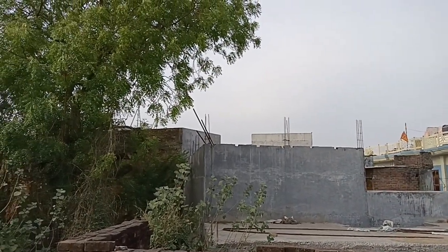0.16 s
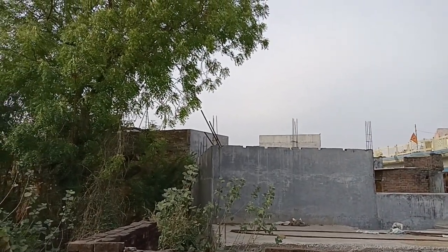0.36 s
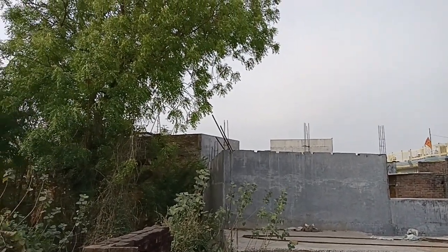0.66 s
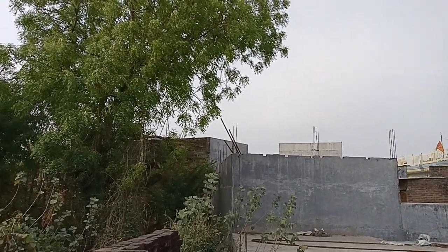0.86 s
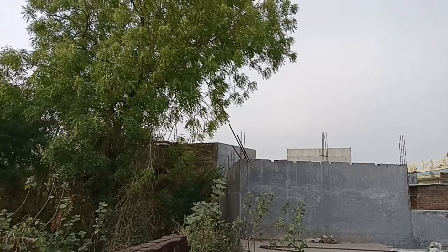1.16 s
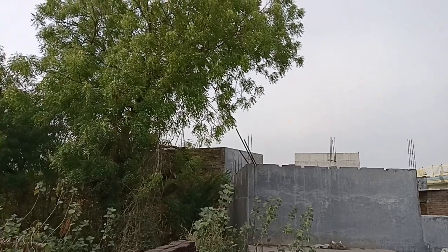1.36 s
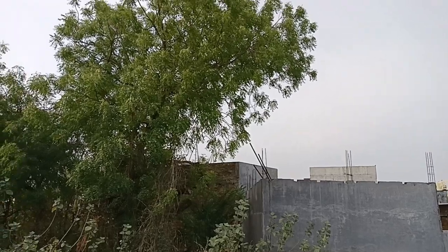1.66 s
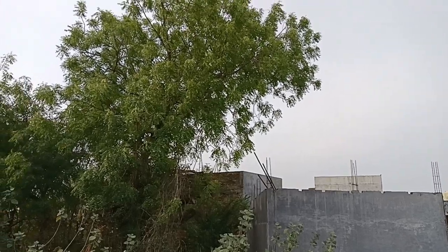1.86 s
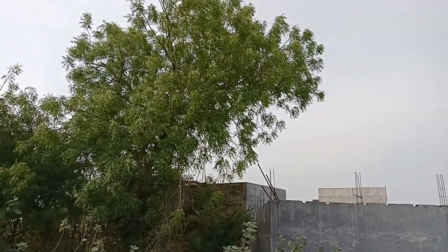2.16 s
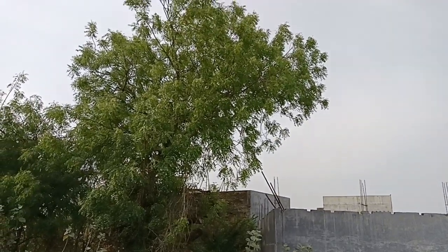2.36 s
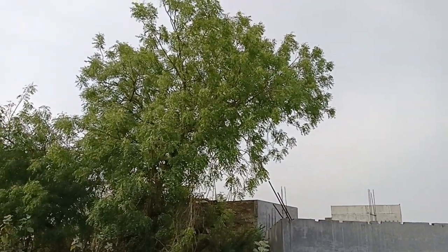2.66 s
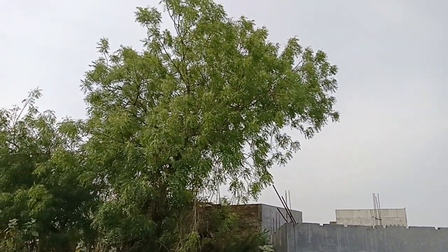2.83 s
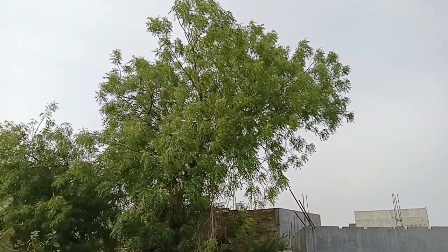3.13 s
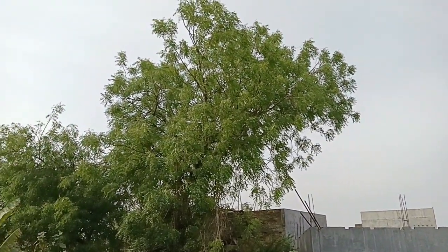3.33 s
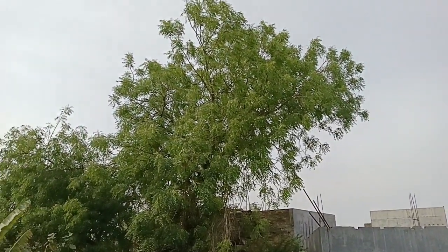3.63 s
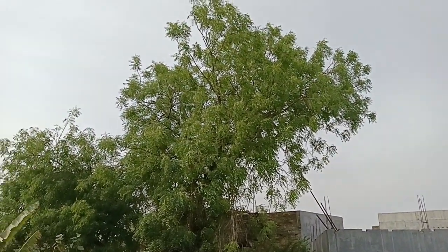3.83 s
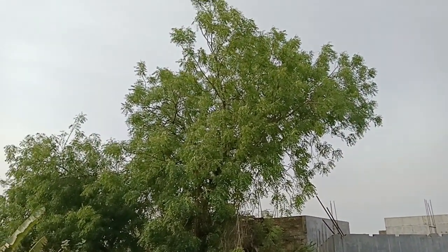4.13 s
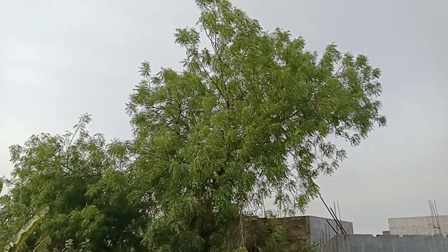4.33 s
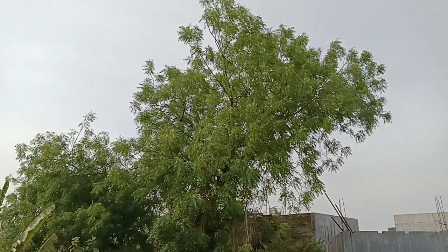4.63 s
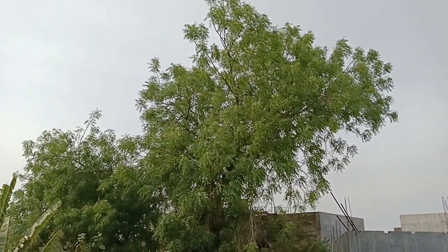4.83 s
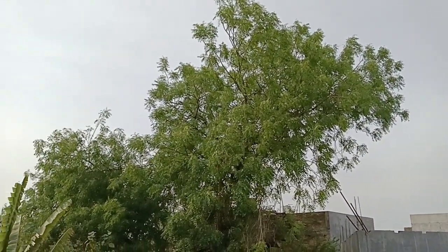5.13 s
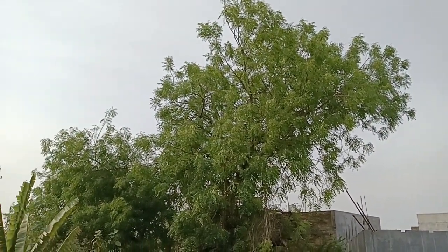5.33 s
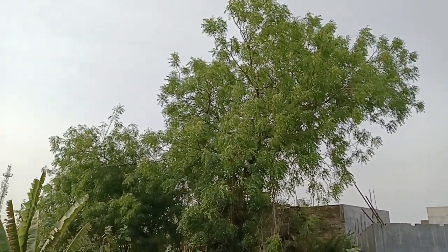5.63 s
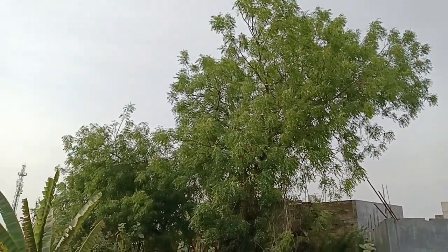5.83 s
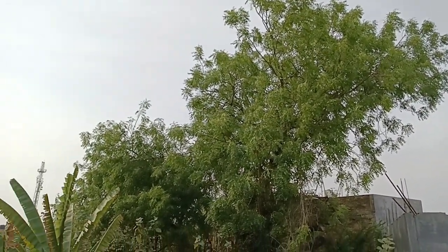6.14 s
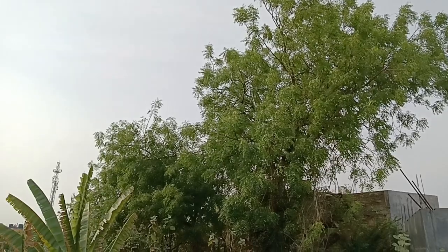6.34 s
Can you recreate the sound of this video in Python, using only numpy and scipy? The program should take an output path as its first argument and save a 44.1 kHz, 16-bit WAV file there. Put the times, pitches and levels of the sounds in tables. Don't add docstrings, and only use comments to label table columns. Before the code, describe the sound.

Clear, echoing bird whistles rise four times, each a little higher, while small birds chip and two distant horns sound over a quiet town.

```python
import sys
import numpy as np
from scipy import signal
from scipy.io import wavfile
from scipy.ndimage import uniform_filter1d

SR = 44100
rng = np.random.default_rng(int(sys.argv[2]) if len(sys.argv) > 2 else 0)


def gain_from_decibels(decibels):
    exponent = np.asarray(decibels, float) / 20
    return 10 ** exponent


def transcribe(u):
    v = np.clip(np.atleast_2d(u).T, -1, 1)
    q = np.round(v * 32767).astype(np.int16)
    wavfile.write(sys.argv[1], SR, q)


N = 286246
LEAD = 22050


def evened(x):
    return x / np.sqrt(np.mean(x ** 2) + 1e-20)


def drift(length, span):
    once = uniform_filter1d(rng.standard_normal(length), span)
    return evened(uniform_filter1d(once, span))


def read(points, hz):
    f, value = np.transpose(points)
    return np.interp(np.log(hz + 1), np.log(f + 1), value)


def curves(rows, smooth=1):
    s, *columns = np.transpose(rows)
    t = np.arange(s[0], s[-1], 1 / SR)
    return [uniform_filter1d(np.interp(t, s, c), smooth, mode="nearest") for c in columns]


def swells(rows, calm_db):
    t = np.arange(N) / SR
    bells = sum(gain_from_decibels(db) * np.exp(-((t - s) / width) ** 2) for s, db, width in rows)
    return 20 * np.log10(gain_from_decibels(calm_db) + bells)


def add(mix, s, sound, pan_db=0):
    part = mix[:, LEAD + round(s * SR):][:, :len(sound)]
    part += gain_from_decibels([[pan_db / 2], [-pan_db / 2]]) * sound[:part.shape[1]]


def stack(hz, orders, wobble=0.):
    turns = np.cumsum(hz * (1 + wobble * drift(len(hz), 500))) / SR
    tone = 0
    for k, db in orders:
        audible = k * hz < 20000
        tone = tone + gain_from_decibels(db) * audible * np.sin(2 * np.pi * (k * turns + rng.random()))
    count = np.arange(len(hz))
    fade = np.clip(np.minimum(count, count[::-1]) / 300, 0, 1)
    return np.sqrt(2) * tone * fade


def noise(colour, level_db, same, patchy_db):
    frames, hz = N // 256 + 5, np.fft.rfftfreq(1024, 1 / SR)
    a, b, c, d, patches = rng.standard_normal((frames, 513, 5), dtype=np.float32).T
    patches = evened(uniform_filter1d(uniform_filter1d(patches, 10, 0), 14, 1))
    same = np.clip(same * np.ones(513), 0, 1)[:, None]
    left = a + 1j * b
    right = same * left + np.sqrt(1 - same ** 2) * (c + 1j * d)
    z = np.array([left, right], dtype=np.complex64)
    tone_db = read([(0.81, -96.5)] + colour + [(17000, -96.5)], hz)[:, None]
    z *= gain_from_decibels(tone_db + patchy_db * patches)
    sound = signal.istft(z, nperseg=1024, noverlap=768)[1][:, :N]
    return gain_from_decibels(level_db) * evened(sound)


# frequency_hz, t60_s
YARD_DECAY = [(300, 0.6), (1000, 0.51), (1500, 1), (3000, 0.94), (5000, 1), (8000, 1), (14000, 0.31)]


def yard(x, walls, direct_db, tail_db, gap=0.0022, lag=0, dull=.0, reach=1):
    taps = np.zeros((2, SR))
    at = np.arange(0, SR - 20, 20) + rng.integers(0, 20, (2, SR // 20 - 1))
    np.put_along_axis(taps, at, rng.choice([-1., 1.], at.shape), 1)
    hz, t, z = signal.stft(taps, SR, nperseg=256)
    decay = gain_from_decibels(-60 * t / reach / read(YARD_DECAY, hz)[:, None])
    reply = signal.istft(z * decay * np.clip(t / gap, 0, 1), SR, nperseg=256)[1]
    reply *= gain_from_decibels(tail_db) / np.linalg.norm(reply[0])
    for s, *db in walls:
        reply[:, round(s * SR)] += gain_from_decibels(db)
    reply = signal.lfilter([(1 - dull) ** 2], [1, -2 * dull, dull ** 2], reply)
    reply[[0, 1], [0, lag]] += gain_from_decibels(direct_db)
    return signal.fftconvolve(np.float32(x), np.float32(reply), axes=1)[:, LEAD:LEAD + N]


# frequency_hz, density_db (per Hz)
TOWN_COLOUR = [(30, -31.5), (50, -17.5), (75, 2.5), (130, 4.5), (250, 2.5), (550, -3), (1100, -11),
               (2100, -9.5), (3300, -18), (4500, -44.5), (6000, -29.5), (7500, -45), (11000, -40),
               (15500, -46.5)]
# frequency_hz, coherence (0 to 1)
TOWN_LIKENESS = [(30, .8), (100, .92), (250, .8), (600, .6), (2000, .4), (8000, .3)]


def town_hum():
    hz = np.fft.rfftfreq(1024, 1 / SR)
    return noise(TOWN_COLOUR, -68.5, read(TOWN_LIKENESS, hz), patchy_db=1)


# start_s, peak_db, left_right_db
SNAPS = [
    (0.0024, -46, 5.5),
    (5.4467, -38, -5),
    (5.4511, -42, -6.5),
    (5.4597, -48.5, -12.5),
    (5.4843, -40, 11.5),
    (5.4974, -43.5, 4.5),
    (5.5106, -44.5, -9),
]


def rustle():
    mix, t = np.zeros((2, LEAD + N)), np.arange(5000) / SR
    for s, db, pan_db in SNAPS:
        tick_and_puff = gain_from_decibels(-60 * t / 0.0053) + gain_from_decibels(-12.0 - 60 * t / 0.14)
        crackle = rng.standard_normal(len(t)) * tick_and_puff
        add(mix, s, gain_from_decibels(db - 11.5) * signal.lfilter([1, .2, -.7], [1], crackle), pan_db)
    return mix[:, LEAD:]


# start_s, pitch_hz, level_db
HORN_LOW = [(-.4, 336.6, -67.5), (.1, 333.3, -55), (.3, 334.3, -55.5), (.4, 333.5, -70), (.46, 331, -75)]
# multiple, level_db
LOW_REED = [(1, -6.5), (5, -12.5), (7, 0.5), (8, 9.5), (9, 2), (10, -2), (11, -7), (12, -10.5), (16, -20.5),
            (19, -28), (22, -39), (25, -38), (28, -38.5)]
# start_s, pitch_hz, level_db
HORN_HIGH = [(1.13, 394, -67), (1.2, 414.5, -61.5), (1.3, 412.9, -50), (1.4, 405.7, -52), (1.6, 413.4, -53),
             (1.8, 399, -62.5), (1.9, 402, -89.5), (1.96, 395, -88.5)]
# multiple, level_db
HIGH_REED = [(1, -5.5), (6, -11), (8, 0.5), (9, 0.5), (10, -18)]
# start_s, pitch_hz, level_db
WHINES = [
    [(5.12, 9400, -95), (5.2, 11400, -88), (5.3, 12800, -90), (5.45, 14200, -92)],
    [(5.3, 11500, -88), (5.45, 12300, -85), (5.5, 12500, -92)],
    [(3.26, 3440, -84), (3.32, 3430, -77), (3.45, 3420, -79)],
    [(5.15, 600, -76), (5.22, 610, -60), (5.32, 600, -76)],
    [(4.0, 500, -82), (4.08, 510, -72), (4.17, 500, -82)],
]


def far_tones():
    mix = np.zeros((2, LEAD + N))
    flutter_db = 2.5
    for rows, reed in ((HORN_LOW, LOW_REED), (HORN_HIGH, HIGH_REED)):
        hz, db = curves(rows)
        partials = [(k, level + flutter_db * drift(len(hz), 1500)) for k, level in reed]
        add(mix, rows[0][0], gain_from_decibels(db) * stack(hz, partials, wobble=.005))
    for rows in WHINES:
        hz, db = curves(rows)
        add(mix, rows[0][0], gain_from_decibels(db) * stack(hz, [(1, 0.0079)], wobble=0.0086))
    return yard(mix, [], -7.5, tail_db=-2.5, reach=.95)


# frequency_hz, half_width_hz, level_db
WINDPIPE = [(2230, 450, -30), (2833, 500, -23), (4500, 130, -28), (5400, 280, -22.5), (6940, 800, -31),
            (10280, 740, -35.5), (12100, 350, -43), (14000, 700, -51)]


def windpipe(hz):
    gain = sum(gain_from_decibels(db) / np.sqrt(1 + ((hz - peak_hz) / width) ** 4) for peak_hz, width, db in WINDPIPE)
    return 20 * np.log10(gain)


OVERTONES_DB = [0, -4.5, -4.5, 3.5, -4, 1, -0.5, -5.5, -8.5]


def koel_call(crest, low_hz, crest_hz, length, breath, factor=1):
    first, dip, second, over, bright_db = breath
    fall_share = (length - crest) / .22
    effort_db, open_db = curves([
        (0, -47, over - 4),
        (0.015, -27, over + 12.5),
        (.048, first, over - 5.5),
        (.15, dip, over),
        (.25, second, over - 1.5),
        (crest, second, over + 6),
        (crest + 0.08, second - 5, over + .1),
        (length - .048 * fall_share ** 2, second - 11.5, over - 3),
        (length, -74, over - 50)], 200)
    t = np.arange(len(open_db)) / SR
    past = t - crest

    climb = np.exp(-(past / .0765) ** 2)
    fall = 4.5 * min(fall_share, 1) * past ** 2 / (past ** 2 + .127 ** 2)
    share = np.where(past < 0, climb, 1 - fall)
    share += 1.04 * np.exp(-t / .044) - 1.6 * np.exp(-t / .0088)
    share -= 27 * (length - crest - .2) * np.exp((t - length) / .025)
    hz = factor * (low_hz + (crest_hz - low_hz) * share)

    late_db = -30 * np.clip(1 - t / 0.034, 0, 1)
    closing_db = -27 * np.clip(1 - hz / np.median(hz), 0, 1) / .3 * (t > .1)
    strain_db = -(np.clip(share, -1, 1) - .5)
    overtones = []
    for k, db in enumerate(OVERTONES_DB, 2):
        turning_db = 3 * (drift(len(hz), 2500) + 1.1 * drift(len(hz), 500))
        level = db + windpipe(k * hz) + turning_db
        level = level + late_db * (k not in (2, 4)) + closing_db * (.4 if k == 2 else 1.25)
        overtones.append((k, level + max(k - 6, 0) * (bright_db + strain_db)))

    band = signal.butter(2, [1800, 3200], "band", fs=SR, output="sos")
    rasp = signal.sosfilt(band, rng.standard_normal(len(t)))
    rasp *= gain_from_decibels(-41 - 60 * abs(t - .008) / 0.097)
    whistle = gain_from_decibels(effort_db) * stack(hz, [(1, 0.012)])
    return whistle, gain_from_decibels(open_db) * stack(hz, overtones) + rasp


# start_s, crest_after_s, low_hz, crest_hz, length_s
KOEL_CALLS = [
    (1.052, .338, 1294, 1484, .538),
    (2.571, .324, 1349, 1539, .569),
    (4.171, .332, 1367, 1546, .549),
    (5.614, .338, 1406, 1626, .556),
]
# first_note_db, dip_db, second_note_db, overtones_db, brightness_db (per multiple)
BREATHS = [
    (-26.5, -37, -22, -34, 2.2),
    (-23.5, -23, -20.5, -28, 0.6),
    (-19, -29.5, -21, -27.5, -0.2),
    (-20, -23, -20.5, -27, 1.9),
]
# shift_s, pitch_factor, level_db
EARLIER_CALL = (-1.5, 0.95, -1)
# delay_s, left_db, right_db
WHISTLE_WALLS = [(.006, -20, -13), (.031, -19, -16), (.072, -10.5, -16), (.09, -19, -20)]
# delay_s, left_db, right_db
BEAM_WALLS = [(.006, -18, -12), (.031, -16, -15), (.066, -19, -19), (.072, -16, -17), (.079, -20, -18)]


def koel():
    whistle, beam = np.zeros((2, 2, LEAD + N))
    shift, factor, db = EARLIER_CALL
    earlier = koel_call(*KOEL_CALLS[0][1:], BREATHS[0], factor)
    calls = [(KOEL_CALLS[0][0] + shift, gain_from_decibels(db) * np.array(earlier))]
    calls += [(s, koel_call(*call, breath)) for (s, *call), breath in zip(KOEL_CALLS, BREATHS)]
    for s, (low, high) in calls:
        add(whistle, s, low)
        add(beam, s, high)
    wet = yard(whistle, WHISTLE_WALLS, [-9., -12.], tail_db=-15, gap=.09, lag=7, dull=.3)
    high_pass = signal.butter(6, 1230, "high", fs=SR, output="sos")
    clear = signal.sosfiltfilt(high_pass, whistle[0])
    wet += gain_from_decibels([[-1.5], [-5.]]) * np.array([clear[LEAD:], clear[LEAD - 7:-7]])
    return wet + yard(beam, BEAM_WALLS, [-.5, -8.], tail_db=-13, gap=.02, lag=9, dull=.14, reach=.4)


# delay_s, left_db, right_db
NEAR_WALLS = [(0.01, -15, -2.5), (.025, -20, -9.5), (0.045, -15.5, -2.5), (.079, -31, -5)]
# wing_hz, trill_middle_s, trill_period_s, strokes_per_s
CRICKET = (5070, 2.055, .2465, 57.5)
# time_s, level_db
CRICKET_LEVEL = [(0, -71), (.9, -69), (1.3, -74), (2.1, -65.5), (3.3, -65.5), (4.3, -62), (5.1, -64),
                 (6.49, -67.5)]


def cricket():
    hz, middle, period, strokes = CRICKET
    t = np.arange(-LEAD, N) / SR
    trill = np.clip(np.cos(2 * np.pi * (t - middle) / period) + .72, 0, 1.3)
    jitter = evened(uniform_filter1d(rng.standard_normal(len(t)), 2000))
    phase = strokes * t + 0.16 * jitter
    stroke = np.maximum(np.sin(2 * np.pi * phase) + 0.15, 0)
    wing = np.sin(2 * np.pi * np.cumsum(hz + 75 * drift(len(t), 80)) / SR)
    level_db = np.interp(t, *np.transpose(CRICKET_LEVEL))
    song = gain_from_decibels(level_db) * evened(trill * stroke * wing)
    return yard(np.array([song, song]), NEAR_WALLS[:2], [-3., -2.], tail_db=-9, gap=.005, lag=3)


# middle_s, level_db, half_width_s
STIRS = [
    (.35, -90.5, 0.39),
    (1.5, -85.5, .1),
    (3.76, -83, 0.082),
    (4.43, -86, .15),
    (5.56, -77, 0.14),
]
# frequency_hz, density_db (per Hz)
LEAF_COLOUR = [(6000, -20), (9000, -7.5), (11000, 2), (13000, -8), (15500, -13)]


def leaf_hiss():
    return noise(LEAF_COLOUR, swells(STIRS, -101), .4, patchy_db=3)


def note(hz0, hz1, length):
    u = np.arange(0, 1, 1 / (length * SR))
    hz = hz1 + (hz0 - hz1) * (1 - u) ** 2.9
    return np.sin(2 * np.pi * np.cumsum(hz) / SR) * np.sin(np.pi * u ** 0.87)


# centre_start_hz, centre_end_hz, swing_start_hz, swing_end_hz, turns_per_s
WARBLE = (5730, 5565, 780, 334, 168)


def tweet(length):
    u = np.arange(0, 1, 1 / (length * SR))
    centre0, centre1, swing0, swing1, turns = WARBLE
    settle = np.clip((u - .4) / 0.41, 0, 1)
    centre = centre0 + (centre1 - centre0) * settle
    swing = swing0 + (swing1 - swing0) * settle
    hz = centre - swing * np.cos(2 * np.pi * turns * u * length)
    angle = 2 * np.pi * np.cumsum(hz) / SR
    voice = np.sin(angle) + gain_from_decibels(-31.5) * np.sin(2 * angle)
    return voice * np.sin(np.pi * u ** 2.4)


# start_s, peak_db, pitch_hz, left_right_db
CHIPS = [(0.6977, -47, 4135, 7), (0.7201, -44, 4200, -1), (0.775, -47.5, 3806, 2), (0.796, -47, 4065, 1),
         (0.863, -50, 3660, -2), (0.9502, -52, 3700, -7), (1.0565, -51, 3860, 2), (1.2204, -43, 4230, -2),
         (2.0248, -54, 4160, 1.5), (2.121, -50, 4050, -5), (3.157, -49.5, 4136, -2),
         (3.4999, -51, 4130, -9), (3.5798, -46.5, 3980, -2), (3.714, -48, 4010, -5.5),
         (4.777, -57.5, 4070, 2), (4.798, -53, 3770, 4), (4.819, -48, 3690, 1), (4.864, -48, 4160, 3),
         (4.946, -46, 3840, -1.5), (5.4201, -49, 4130, -3), (5.524, -47.5, 4050, -6.5),
         (6.0737, -54, 4290, -13), (6.1845, -47.5, 3990, -6)]
# start_s, peak_db, end_hz, left_right_db
SLURS = [
    (0.72, -56, 9060, -6.5),
    (0.775, -60.5, 7230, -6),
    (0.864, -54.5, 7530, -5),
    (.952, -54, 7620, 0.5),
    (1.222, -55.5, 9340, -3),
]
# start_s, peak_db, end_hz, left_right_db
TICKS = [(1.541, -63, 6530, -8.5), (2.027, -65.5, 6450, -4.5), (2.125, -63, 6540, -4),
         (3.505, -64.5, 6480, -3), (3.583, -60, 6730, -3), (3.717, -61, 6590, -2.5), (4.135, -70, 6520, -4),
         (4.868, -62, 6540, 0.5), (4.949, -60, 6790, -2.5), (5.425, -65.5, 6370, -16),
         (5.527, -62.5, 6500, 1), (6.08, -70, 6330, -16), (6.187, -66.5, 6390, 3)]
# start_s, peak_db, length_s, left_right_db
TWEETS = [
    (0.489, -42, 0.028, -4),
    (1.686, -40.5, 0.017, -2),
    (3.136, -50, 0.038, -1),
    (4.743, -59, 0.033, 1),
    (5.309, -47, 0.026, 2.5),
]
# start_s, peak_db, start_hz, end_hz, length_s
DROOP = (6, -70.5, 4097.5, 3492, 1.2)


def small_birds():
    chips, slurs = np.zeros((2, 2, LEAD + N))
    for s, db, hz, pan_db in CHIPS:
        add(chips, s - .002, gain_from_decibels(db) * note(0.88 * hz, 1.021 * hz, 0.0049), pan_db)
        add(slurs, s, gain_from_decibels(db - 26.5) * note(1.5 * hz, 2.12 * hz, 0.0047))
    add(chips, 5.538, gain_from_decibels(-53.5) * note(3500, 2660, .008))
    add(slurs, DROOP[0], gain_from_decibels(DROOP[1]) * note(*DROOP[2:]))
    for s, db, hz, pan_db in SLURS:
        from_hz, slur_s = .83 * hz, .02
        add(slurs, s, gain_from_decibels(db) * note(from_hz, hz, slur_s), pan_db)
        add(slurs, s, gain_from_decibels(db - 18.5) * (hz < 8000) * note(2 * from_hz, 2 * hz, slur_s))
    for s, db, hz, pan_db in TICKS:
        from_hz, tick_s = 6250, .011
        add(slurs, s, gain_from_decibels(db) * note(from_hz, hz, tick_s), pan_db)
        add(slurs, s, gain_from_decibels(db - 21.5) * note(2 * from_hz, 2 * hz, tick_s))
    for s, db, length, pan_db in TWEETS:
        add(slurs, s, gain_from_decibels(db) * tweet(length), pan_db)
    wet_chips = yard(chips, NEAR_WALLS, 0.5, tail_db=-0.5, lag=2, reach=0.46)
    return wet_chips + yard(slurs, NEAR_WALLS[:2], 1.4, tail_db=3.5, gap=0.015, lag=5, reach=0.43)


# middle_s, level_db, half_width_s
GUSTS = [
    (2.77, -64.5, 0.049),
    (2.95, -68, 0.048),
    (4.4, -68, 0.047),
    (5.22, -64, 0.093),
    (5.52, -67, 0.15),
    (6.03, -59.5, 0.22),
    (6.4, -72, 0.13),
]
# frequency_hz, density_db (per Hz)
WIND_COLOUR = [(25, -37), (45, -19.5), (75, 4), (130, -7), (220, -19), (350, -31.5), (700, -52)]


def wind():
    return noise(WIND_COLOUR, swells(GUSTS, -80.5), .85, patchy_db=2)


# middle_s, level_db
KNOCKS = [
    (2.77, -53.5),
    (2.95, -64),
]


def hand_knocks():
    band = signal.butter(1, [173, 346], "band", fs=SR, output="sos")
    thud = evened(signal.sosfilt(band, rng.standard_normal(N)))
    return thud * gain_from_decibels(swells([(s, db, 0.01) for s, db in KNOCKS], -120))


def scene():
    steady = town_hum() + rustle() + far_tones()
    animals = koel() + cricket() + small_birds()
    return steady + animals + leaf_hiss() + wind() + hand_knocks()


def roll_off(x):
    return signal.sosfilt(signal.butter(12, 15800, fs=SR, output="sos"), x)


def record(dry):
    high_pass = signal.butter(3, 52, "high", fs=SR, output="sos")
    ports = signal.sosfilt(high_pass, dry)
    return roll_off(ports)


dry = scene()
out = record(dry)
transcribe(out)
```